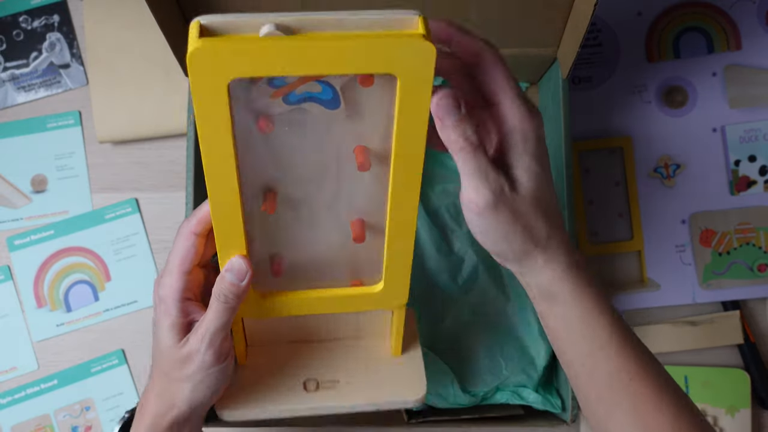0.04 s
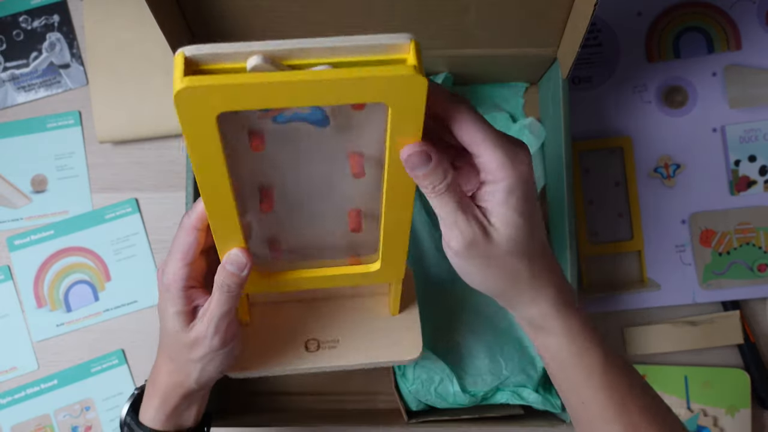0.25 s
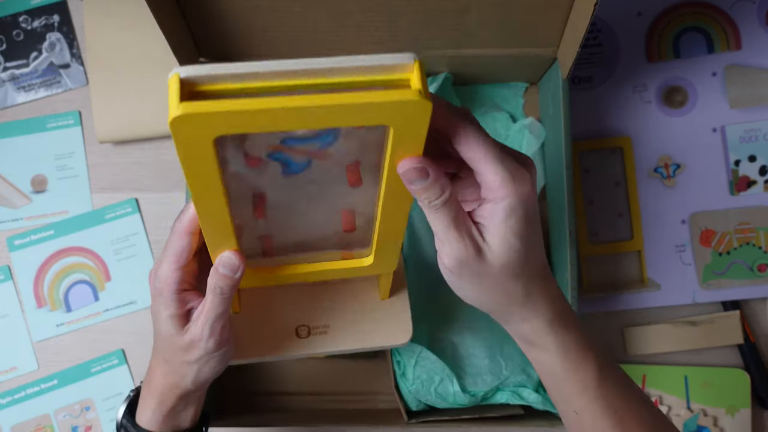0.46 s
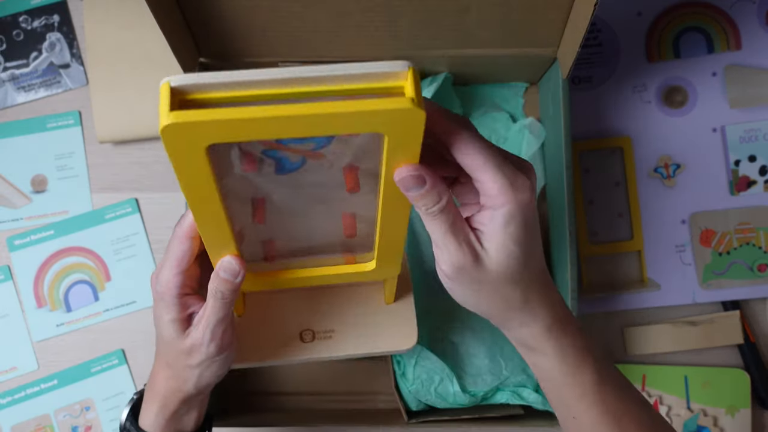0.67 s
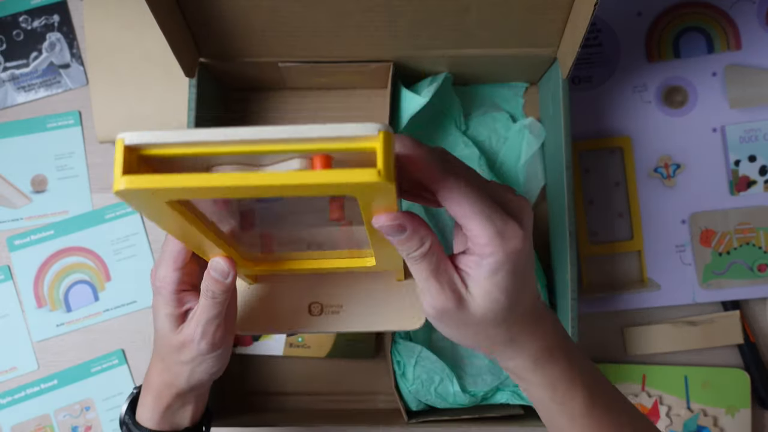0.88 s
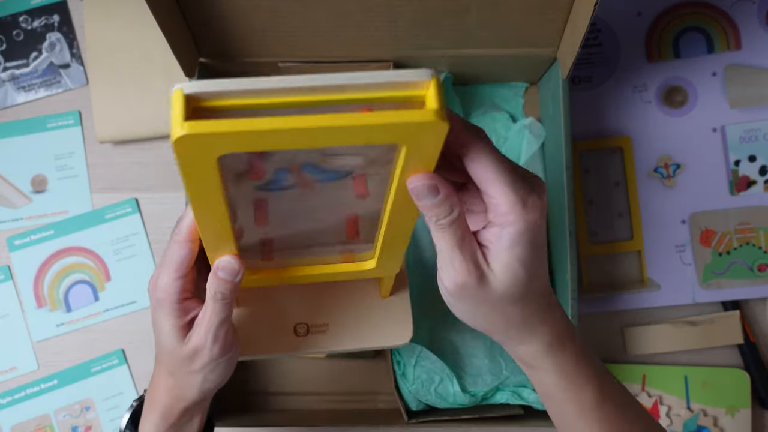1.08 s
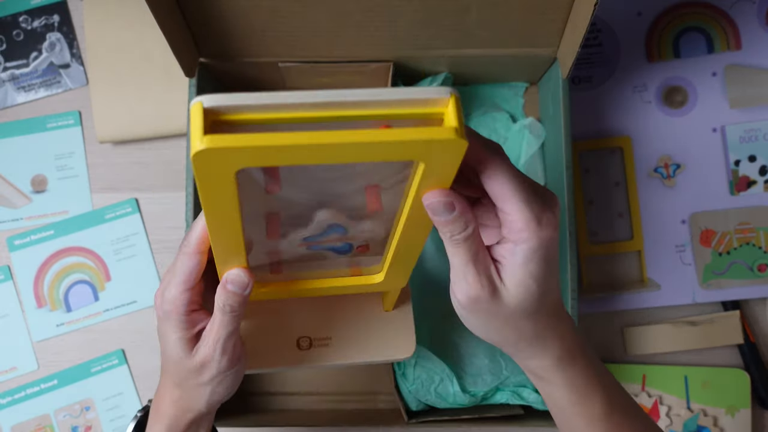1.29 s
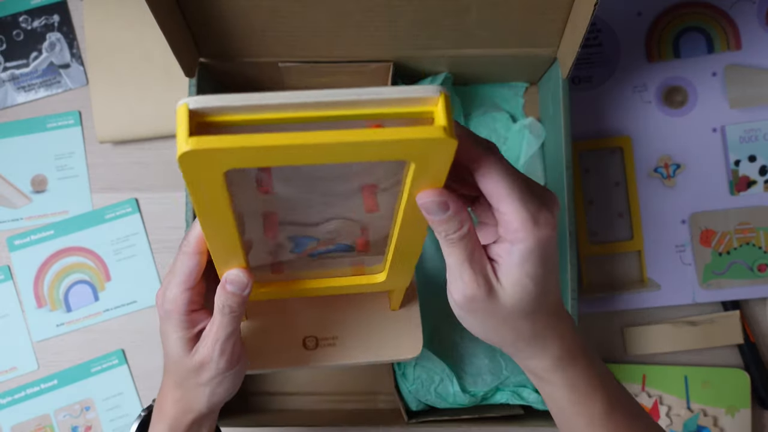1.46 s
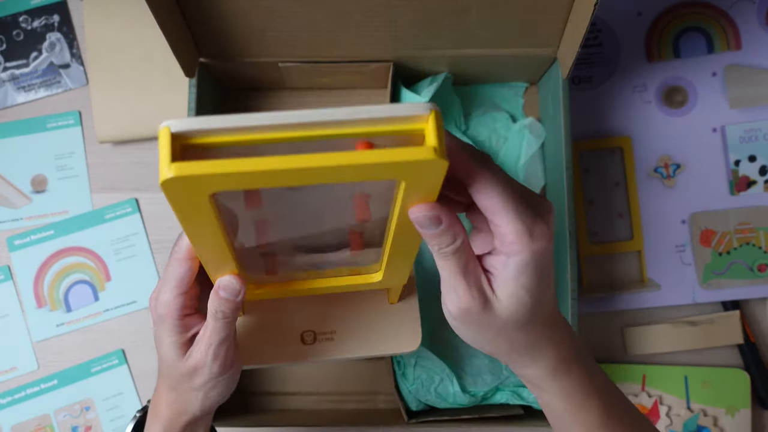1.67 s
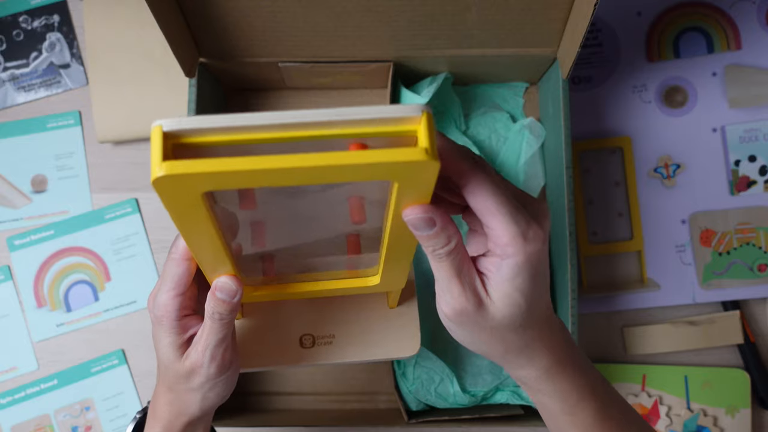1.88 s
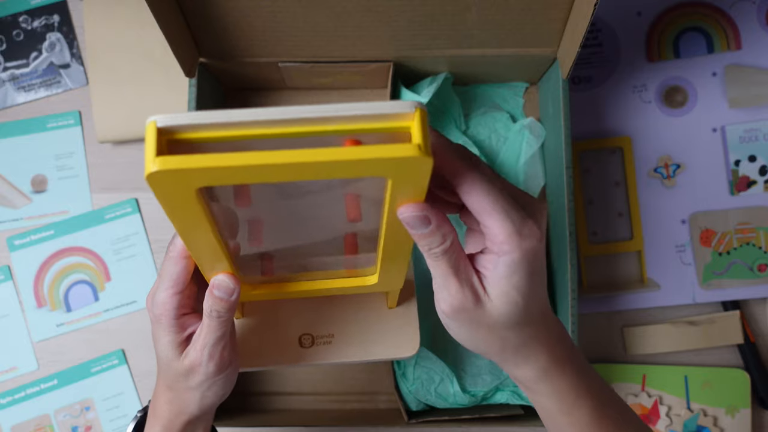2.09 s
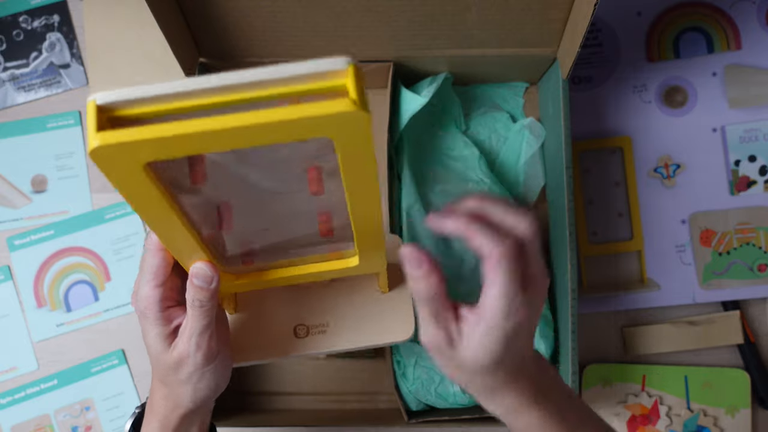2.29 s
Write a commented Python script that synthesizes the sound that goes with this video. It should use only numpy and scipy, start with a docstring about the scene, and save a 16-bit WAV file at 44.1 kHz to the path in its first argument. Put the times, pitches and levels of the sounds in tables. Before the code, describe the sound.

Loose pieces clatter down inside a wooden toy with plastic panes, close to the microphone in a small room. A short burst of knocks, a lull and a longer run lead to two sharp clicks and faint rubbing.

```python
"""A wooden drop toy is tilted by hand close to the microphone. After a faint slide, loose pieces tumble:
each knock rings the frame and makes the clear plastic panes give a short crack. In a lull a piece slides
and squeaks faintly, then a longer run of knocks follows. Near 2 s the fall ends with two sharp clicks
against a peg, and soft rubbing comes last. All along, a small room echoes and the hardest knocks
overload the microphone."""
import sys
import numpy as np
from scipy import signal
from scipy.fft import rfft, irfft
from scipy.io import wavfile
from scipy.ndimage import uniform_filter1d

SR = 44100
rng = np.random.default_rng(int(sys.argv[2]) if len(sys.argv) > 2 else 0)


def generate_wav(signal):
    """Clip the signal to [-1, 1] and save it as 16-bit WAV at the path in sys.argv[1]."""
    frames = np.transpose(np.atleast_2d(signal))
    scaled = np.clip(frames, -1, 1) * 32767
    pcm = np.round(scaled).astype(np.int16)
    wavfile.write(sys.argv[1], SR, pcm)


N = 108045
TIME = np.arange(N) / SR
PEG_RISE_S = 0.00053
PLAIN = (0, 0, 0)  # a hit's tone colour: no extra thud, clack or tick

# The panes' short ring; a fade time is the time to fall by 60 dB.
# (pitch [Hz], relative level [dB], fade time [s])
PANE_BANDS = [(470, -36, 0.015), (697, -36, 0.035), (1210, -13.5, 0.029), (2100, -11.5, 0.042),
              (2620, -7, 0.028), (4340, -10, 0.021), (5620, -15.5, .017), (9280, -24.5, .014),
              (14300, -31.5, 0.024)]


def amp(db):
    """Turn decibels into a volume factor."""
    return 10 ** (np.asarray(db) / 20)


def unit(x):
    """Scale a sound to an average power of one."""
    return x / np.sqrt(np.mean(x ** 2))


def noise_bands(table):
    """Fresh noise, split into overlapping bands around the pitches in the table's first column."""
    log_hz = np.log(np.maximum(np.arange(N // 2 + 1) * SR / N, 1))
    centres = np.log([row[0] for row in table])
    bass_cut = np.exp(4 * np.minimum(log_hz - centres[0] + np.log(2) / 2, 0))
    spectrum = rfft(rng.standard_normal(N)) * bass_cut
    return [irfft(spectrum * np.sqrt(np.interp(log_hz, centres, share)), N)
            for share in np.eye(len(table))]


def noise(table):
    """Steady noise with its own level in each band."""
    return sum(amp(db) * unit(band) for (_, db), band in zip(table, noise_bands(table)))


def add(out, start, sound):
    """Mix a sound in at its start time."""
    i = max(int(start * SR), 0)
    out[i:i + len(sound)] += sound[:max(len(out) - i, 0)]


def swell(start, length):
    """A smooth rise and fall."""
    return np.sin(np.pi * np.clip((TIME - start) / length, 0, 1))


def contact_db(hz, thud, clack, tick):
    """How much a hit boosts one pitch: heavy hits thud, hard ones clack and tick."""
    # Where the thud, two unchanged middle points, the clack and the tick lie: (pitch [Hz])
    pitches = [700, 1050, 1750, 3000, 7000]
    return np.interp(np.log(hz), np.log(pitches), [thud, 0, 0, clack, tick])


def ring(tones, colour, rise_s, detune=0.009, scatter_db=1.5):
    """A struck object rings with its own fading tones, a little differently at every blow."""
    t = TIME[:SR // 4]
    out = 0
    for hz, db, fade_s in tones:
        strength, mistune = rng.standard_normal(2)
        phase = 2 * np.pi * (hz * (1 + detune * mistune) * t + rng.random())
        level = amp(db + contact_db(hz, *colour) + scatter_db * strength)
        out = out + level * np.exp(-np.log(1000) * t / fade_s) * np.sin(phase)
    return (1 - np.exp(-t / rise_s)) * out


def background():
    """The quiet room's steady rumble and hiss."""
    # Room noise: (pitch [Hz], level [dB])
    hush = [(25, -56), (60, -62.5), (125, -66.5), (230, -78), (450, -74), (1150, -72.5), (2000, -79),
            (3500, -73), (7000, -78), (13000, -75)]
    return noise(hush)


def sliding(grain_db=3):
    """Pieces and fingers rub over the toy, making an uneven hiss that stirs the frame."""
    # Each rub: (time [s], length [s], hiss level [dB], frame level [dB])
    slides = [(0.102, .11, -62.5, -62.5), (0.732, 0.17, -63.5, -70), (2.269, 0.17, -66, -63.5),
              (2.405, 0.13, -60.5, -47)]
    # The tone colour of the hiss: (pitch [Hz], relative level [dB])
    hiss_bands = [(500, -22), (1150, -6), (2000, -9), (3500, 1), (7000, -10), (13000, -9.5)]
    grain = amp(grain_db * unit(uniform_filter1d(rng.standard_normal(N), size=250)))
    hiss = unit(noise(hiss_bands) * grain)
    stirred = unit(signal.fftconvolve(hiss, frame_ring(1.0, PLAIN))[:N])
    return sum((amp(hiss_db) * hiss + amp(frame_db) * stirred) * swell(start, length)
               for start, length, hiss_db, frame_db in slides)


def frame_ring(place, colour):
    """The wooden frame's mix of tones depends on where it is hit, from top (0) to bottom (1)."""
    # The frame's own tones: (pitch [Hz])
    pitches = [366, 452, 641, 688, 1095, 1212, 1390, 1530, 1755, 2195, 2810, 3235, 3925, 4875, 5880]
    # For each tone: (relative level hit at the top [dB], the same at the bottom [dB], fade time [s])
    responses = [(-28, -35, .16), (-33, -28, 0.11), (-17, -22, 0.12), (-7, -10, 0.051), (0.5, 2.5, 0.056),
                 (5, -11, .05), (0.5, -16.5, .04), (6.5, -18, 0.034), (-1, 1.5, 0.034), (-3, -1, 0.044),
                 (-17.5, -5.5, 0.031), (-12, -8.5, 0.041), (0, -5, 0.023), (-14, -9, 0.032),
                 (-9.5, -19.5, 0.024)]
    tones = [(hz, np.interp(place, [0, 1], [top, bottom]), fade_s)
             for hz, (top, bottom, fade_s) in zip(pitches, responses)]
    return ring(tones, colour, rise_s=0.0013)


def pane_crack(pane_noise, start, colour, rise_s=0.0006, hold_s=0.0012):
    """The panes' crowded tones blur into a burst of noise that holds an instant and dies."""
    i = max(int(start * SR), 0)
    t = TIME[:min(SR // 8, N - i)]
    decay = -np.log(1000) * np.maximum(t - hold_s, 0)
    burst = sum(amp(db + contact_db(hz, *colour)) * np.exp(decay / fade_s) * band[i:i + len(t)]
                for (hz, db, fade_s), band in zip(PANE_BANDS, pane_noise))
    return (1 - np.exp(-t / rise_s)) * burst


def chatter(pane_noise, start, colour, bounces=2, gap_s=0.0083, step_db=-17.5):
    """After a knock the piece bounces at uneven gaps, each time more weakly."""
    # A bounce is a softer hit: (extra thud [dB], extra clack [dB], extra tick [dB])
    softening = (-7.5, -2, -2)
    out = np.zeros(SR // 4)
    delays = np.cumsum(gap_s * (.5 + rng.random(bounces)))
    for k, delay in enumerate(delays, 1):
        add(out, delay, amp(k * step_db) * pane_crack(pane_noise, start + delay, np.add(colour, softening)))
    return out


def knocks(pane_noise, frame_db=-2.5, pane_db=-4):
    """Tumbling pieces ring the frame, sound the panes and bounce."""
    # Each knock: (time [s], relative level [dB], extra thud [dB], extra clack [dB], extra tick [dB],
    # place [0 top to 1 bottom])
    hits = [(0.178, -35, -1, -18.5, -11.5, 0.28), (0.208, -31, 1, -9, -12.5, 0.1),
            (0.218, -14.5, -1, 2.5, -10, 0.051), (0.231, -21, 3, -22, -18, 0.22),
            (0.286, -29, 5, 1.5, -10, 0.081), (0.293, -21.5, 1.5, -13, -16, 0.12),
            (0.3644, -0.5, -10.5, -2.0, -0.5, 0.028), (0.371, -12.5, 19.5, 10, 20, 0.14),
            (0.377, -10, 5.5, -6.5, -12, 0.083), (0.403, -15, 12.5, -1, -1.5, 0.14),
            (0.41, -1.5, 0, 1, 9, 0.071), (0.472, -13, 3.5, -0.5, 8.5, 0.076),
            (0.48, -7, 3.5, -9, 12.5, 0.15), (0.485, -10.5, 9.5, 5, 0.5, 0.084),
            (0.519, -7, -11, 1.5, 4.5, 0.1), (0.523, -7, 1, 5.5, 13, 0.084),
            (0.63, -15.5, -4, 4.5, -2, 0.33), (0.986, -48.5, 4.0, -27, -8.0, 0.097),
            (1.02, -34, 1, -9.5, -4.5, 0.12), (1.056, -20.5, 4, 0.5, -35, 0.6),
            (1.06, -14.5, -23, -33, -12.5, 0.37), (1.1105, -19, 2.5, 10.5, 10.5, 0.28),
            (1.128, -12, -8, -13, -5, 0.41), (1.133, -16.5, -5.5, -9, -13.5, 0.79),
            (1.144, -21.5, 6, 8.5, 0.5, 0.49), (1.179, -28, -1.5, -4.5, -0.5, 0.37),
            (1.215, -12.5, 3.5, 5.5, 19.5, 0.93), (1.221, -3.5, 7.5, -2.5, 4, 0.35),
            (1.243, -18, -15, 3, -19, 0.6), (1.26, -5, 4, 4.5, 4, 0.5),
            (1.265, -8.5, -11, -3.5, 12.5, 0.21), (1.282, -18.5, 3, 8.5, -2, 0.84),
            (1.296, -16.5, 12, 5, 11.5, 0.32), (1.308, -12, 6, 13.5, 3, 0.36),
            (1.327, -14.5, 4, -2.5, 5, 0.5), (1.393, -15, -2, 1, -15.5, 0.56),
            (1.397, -8.5, 4.5, 12, 8, 0.76), (1.407, -10.5, -13.5, -3.5, -2, 0.9),
            (1.437, -24, 7, 1, -2, 0.6), (1.5036, -15.5, -4.5, -6, -15, 0.98),
            (1.516, -15, -4.5, -19.5, -6.5, 0.88), (1.558, -14, -1, 9.5, 8.5, 1),
            (1.5675, -8, -4, -3, 5.0, 0.6), (1.587, -15.5, -3.5, 2, -10.5, 0.44), (1.6158, -9, -7, 8, 3, 1),
            (1.627, -22, -2, -3, -1, .9), (1.638, -16.5, 2, -7.5, 1.5, 0.52),
            (1.647, -22.5, -11, -8, -23.5, 0.8), (1.6705, -18.5, -11, -4, 0, 0.99),
            (1.684, -10.5, -4.5, 3, 0.0, 0.76), (1.724, -22.5, 5, 1.5, 4.5, 0.93),
            (1.743, -17, 3, 2.5, 6, 1), (1.751, -9, -7, -11.5, -4.5, 0.78), (1.756, -13, -32.5, 1, 6, 0.61),
            (1.833, -21, -7, -7.5, -12, 0.76)]
    frame, panes = np.zeros(N), np.zeros(N)
    for start, db, *colour, place in hits:
        add(frame, start, amp(db + frame_db) * frame_ring(place, colour))
        add(panes, start, amp(db + pane_db) * pane_crack(pane_noise, start, colour))
        add(panes, start, amp(db + pane_db) * chatter(pane_noise, start, colour))
    return frame, panes


def piece_notes(fade_s=0.039):
    """A piece that lands squarely rings with a short note of its own."""
    # Each note: (time [s], pitch [Hz], level [dB])
    notes = [(.41, 2170, -3), (1.1114, 3950, -12.5), (1.221, 2283, -5), (1.26, 4020, -8.5),
             (1.308, 3946, -6.5), (1.397, 3874, -2.5), (1.558, 4020, -9), (1.6158, 2270, -6)]
    out = np.zeros(N)
    for start, hz, db in notes:
        add(out, start, ring([(hz, db, fade_s)], PLAIN, PEG_RISE_S))
    return out


def squeak(start_s=0.829, length_s=0.062, level_db=-50):
    """A sliding piece briefly makes the frame sing."""
    # Two narrow bands of noise: (pitch [Hz], width [Hz], relative level [dB])
    tones = [(702, 60, -1.5), (1514, 45, -7.5)]
    out = 0
    for hz, width, db in tones:
        band = signal.butter(2, [hz - width / 2, hz + width / 2], "band", fs=SR, output="sos")
        out = out + amp(db) * unit(signal.sosfilt(band, rng.standard_normal(N)))
    return amp(level_db) * swell(start_s, length_s) * out


def peg_clicks(pane_noise, peg_db=-7.5, pane_db=-6.5):
    """A piece snaps against a peg, which rings while the panes crack."""
    # Two sharp clicks and two faint ones:
    # (time [s], relative level [dB], extra thud [dB], extra clack [dB], extra tick [dB])
    clicks = [(1.914, -29, 0, -8, -2), (1.92, -2.5, 1, 10, 2.5), (2.0221, -3, 5, 5.5, 9.5),
              (2.073, -23, 11, -27, -14)]
    # A peg's own tones: (pitch [Hz])
    pitches = [1185, 1680, 2372, 2800, 3310, 3520, 3810, 4880, 6000, 14400]
    # For each tone: (relative level [dB], fade time [s])
    responses = [(-11, 0.066), (-2, 0.036), (1.5, 0.028), (-5, 0.03), (-6.5, 0.022), (-2.5, 0.031),
                 (3, 0.0097), (0.5, 0.018), (-14.5, 0.025), (-23.5, .016)]
    tones = [(hz, db, fade_s) for hz, (db, fade_s) in zip(pitches, responses)]
    pegs, panes = np.zeros(N), np.zeros(N)
    for start, db, *colour in clicks:
        add(pegs, start, amp(db + peg_db) * ring(tones, colour, PEG_RISE_S))
        add(panes, start, amp(db + pane_db) * pane_crack(pane_noise, start, colour))
    return pegs, panes


def room_echo(sound, positions=12, delay_s=0.012, build_s=0.0024):
    """The room's wash of echoes loses its treble first and changes as the toy is moved."""
    # The echo's bands: (pitch [Hz], relative level [dB])
    echo_bands = [(150, -20.5), (370, -12.5), (700, -16.5), (1200, -19), (2200, -20), (4000, -22),
                  (8000, -26.5)]
    # For each band: (fade time [s])
    fade_times = [.45, .36, .34, .3, .29, .26, .22]
    size = 3 * SR // 4
    t = np.maximum(TIME[:size] - delay_s, 0)
    fades = [(1 - np.exp(-t / build_s)) * np.exp(-np.log(1000) * t / fade_s) for fade_s in fade_times]
    fades = np.array([amp(db) * fade / np.sqrt(np.sum(fade ** 2))
                      for (_, db), fade in zip(echo_bands, fades)])
    bands = np.array(noise_bands(echo_bands))
    out = np.zeros(N)
    for k, share in enumerate(np.eye(positions)):
        i = k * (N - size) // positions  # each position has its own stretch of noise
        echo = np.sum(fades * bands[:, i:i + size], axis=0)
        nearness = np.interp(TIME, np.linspace(0, TIME[-1], positions), share)
        out += signal.fftconvolve(sound * np.sin(np.pi / 2 * nearness), echo)[:N]
    return out


def wall_echo(sound, delay_s=0.0205, level_db=-19.5, top_hz=4970):
    """A near wall sends back one duller copy."""
    out = np.zeros(N)
    add(out, delay_s, amp(level_db) * signal.lfilter(*signal.butter(2, top_hz, fs=SR), sound))
    return out


def scene():
    """The toy, too small to give off bass, in a quiet room."""
    pane_noise = [unit(band) for band in noise_bands(PANE_BANDS)]
    rubbing = sliding() + squeak()
    frame, knocked_panes = knocks(pane_noise)
    pegs, clicked_panes = peg_clicks(pane_noise)
    small_parts = piece_notes() + pegs
    panes = knocked_panes + clicked_panes
    direct = rubbing + frame + small_parts + panes
    # The broad panes fill the room more than the narrow frame and pegs do.
    into_room = rubbing + amp(-0.5) * frame + amp(-5) * small_parts + amp(3.5) * panes
    toy = direct + room_echo(into_room) + wall_echo(into_room)
    bass_cut = signal.butter(2, 340, "high", fs=SR, output="sos")
    return (signal.sosfilt(bass_cut, toy) + background())[None]


def record(dry, overload=0.99, low_cut_hz=45, top_hz=16000):
    """The microphone clips the hardest knocks, thins the deep bass and cuts the highest treble."""
    clipped = np.clip(dry, -overload, overload)
    thinned = signal.lfilter(*signal.butter(1, low_cut_hz, "high", fs=SR), clipped)
    return signal.sosfilt(signal.ellip(8, .2, 70, top_hz, fs=SR, output="sos"), thinned)


dry = scene()
out = record(dry)
generate_wav(out)
```